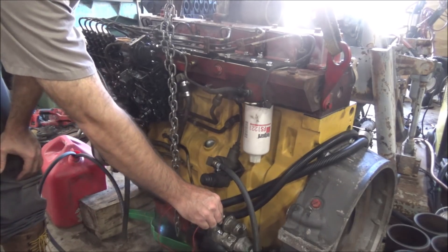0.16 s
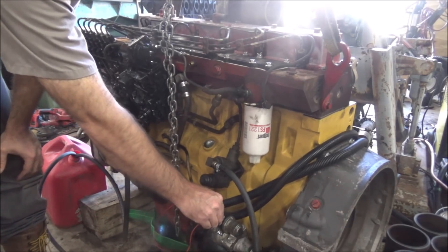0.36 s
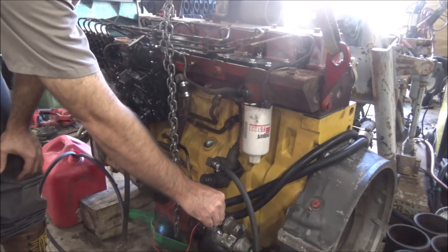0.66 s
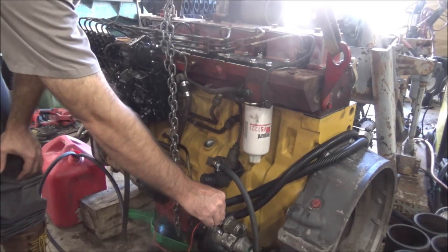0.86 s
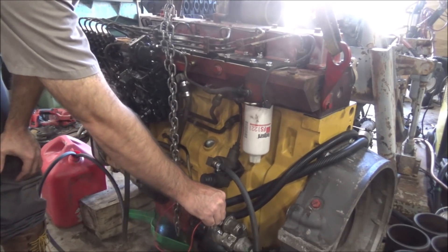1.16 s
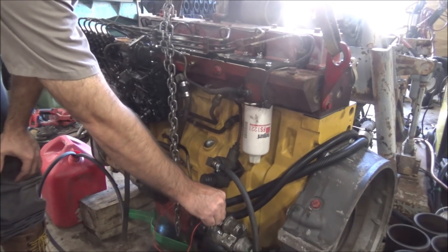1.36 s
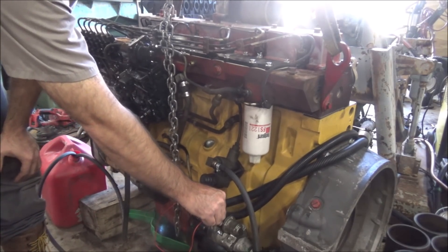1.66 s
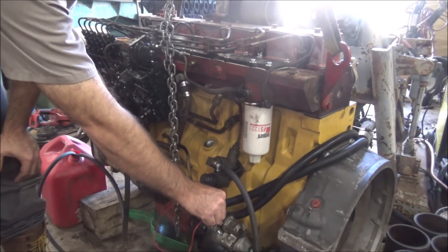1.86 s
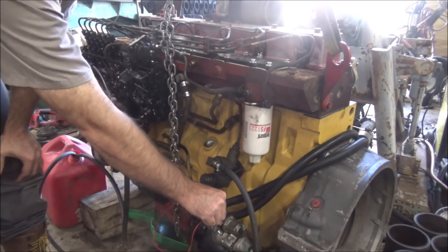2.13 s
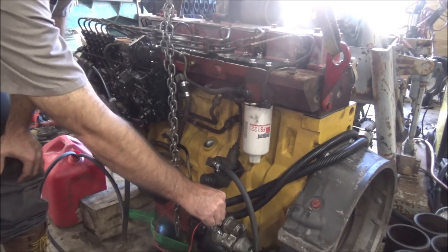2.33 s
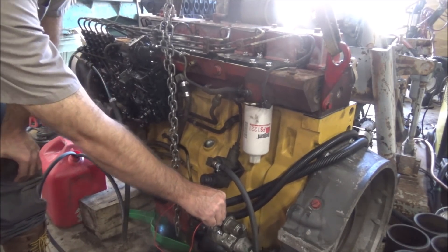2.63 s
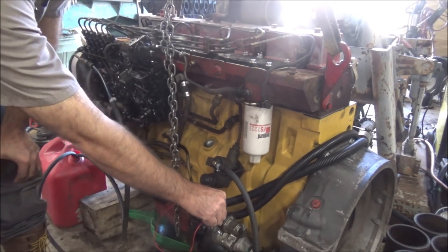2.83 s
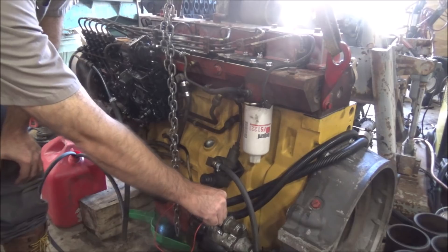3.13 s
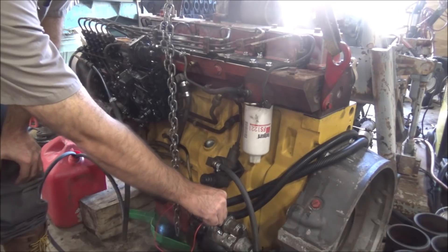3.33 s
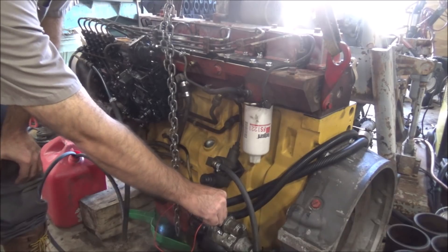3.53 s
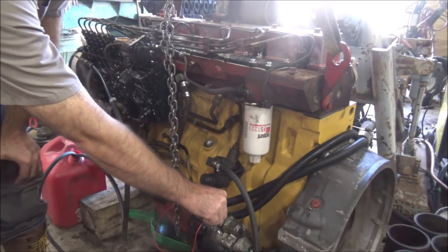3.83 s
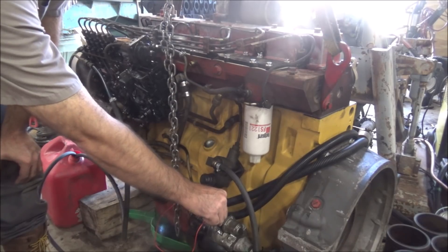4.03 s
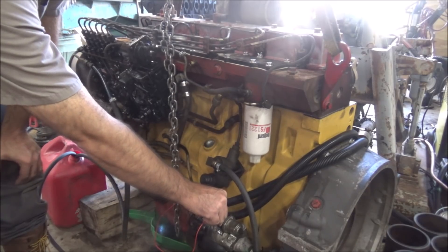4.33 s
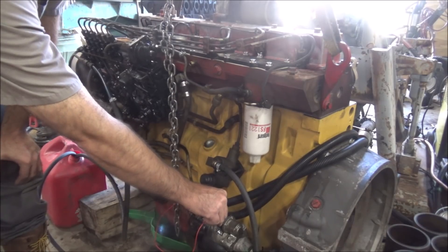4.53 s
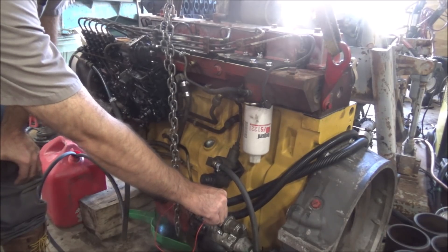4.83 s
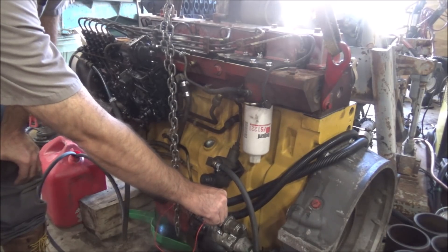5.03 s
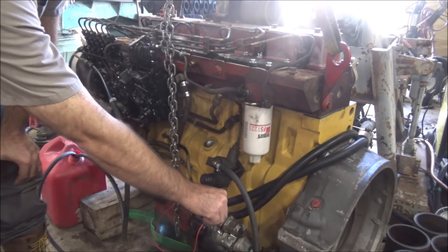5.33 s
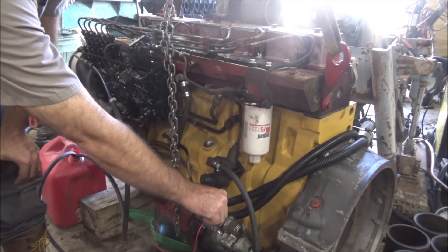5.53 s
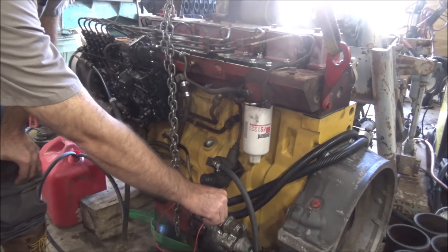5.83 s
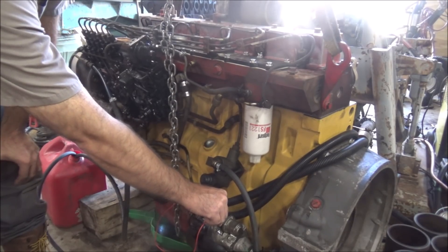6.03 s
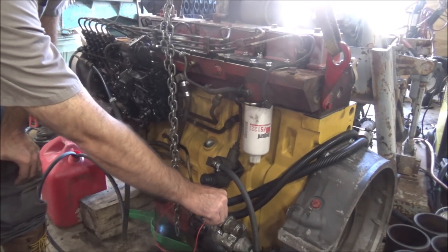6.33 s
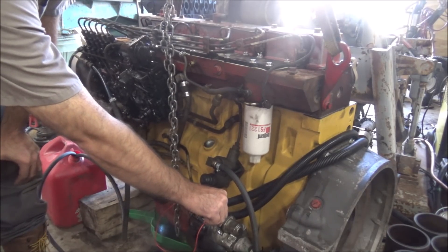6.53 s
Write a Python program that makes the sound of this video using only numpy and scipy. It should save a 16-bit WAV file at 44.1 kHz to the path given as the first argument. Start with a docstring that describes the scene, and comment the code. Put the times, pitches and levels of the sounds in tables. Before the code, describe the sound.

A large diesel engine turns over close by in a workshop with even, clashing metal pulses and a steely ring, never starting.

```python
"""A snap, a screech, then rhythmic grinding and clatter: a big diesel cranks and never fires.
Close by in a workshop, the starter's solenoid throws the pinion into the ring gear, and the pinion
grinds the six-cylinder engine up to speed. On each stroke the flywheel overruns: the teeth clash,
rebound and clatter over a soft low thud. The steel flywheel keeps singing."""
import sys
import numpy as np
from scipy import signal
from scipy.fft import rfft, irfft, next_fast_len
from scipy.io import wavfile
from scipy.ndimage import uniform_filter1d, minimum_filter1d, map_coordinates

SR = 44100
rng = np.random.default_rng(int(sys.argv[2]) if len(sys.argv) > 2 else 0)


def master_out(mix):
    """Clip the mix to full scale and print it as 16-bit PCM to the path in sys.argv[1]."""
    frames = np.transpose(np.atleast_2d(mix))
    ceiling = np.clip(frames, -1, 1)
    pcm = np.round(ceiling * 32767).astype(np.int16)
    wavfile.write(sys.argv[1], SR, pcm)


N = 294588
TIME_S = np.arange(N) / SR

# broad spectra of room noise, block thud and tooth contacts: freq_hz, density_db
SHOP_SPECTRUM = [(20, -26.5), (110, -5), (1000, -12.5), (15000, -32)]
THUD_SPECTRUM = [(25, -13), (60, 0), (120, 5), (600, -59)]
CLATTER_SPECTRUM = [(60, -42.5), (180, -18), (300, -2.5), (600, -0.5), (900, 1.5), (1280, -6), (1700, -1.5),
                    (2300, -4.5), (3200, -13.5), (5000, -15), (11500, -22.5), (15500, -39)]
SCRAPE_SPECTRUM = [(1000, -10.5), (3000, 3), (4300, 3), (5200, -1), (12000, 2), (15500, -7)]
CLASH_SPECTRUM = [(150, -19.5), (400, -6.5), (850, 5), (1280, -5.5), (1850, 7.5), (2400, -2), (3600, 2.5),
                  (5000, -5), (11500, -3), (15500, -12)]
# resonances of block and bell housing, and of the pinion and its nose: freq_hz, width_hz, lift_db
HOUSING_MODES = [(337, 15, 9.5), (403, 33, 7.5), (551, 27, 8), (645, 71, 3), (744.8, 29.6, 12),
                 (831.6, 52, 11), (1054, 68, 9.5), (1161, 39, 8), (1434, 72, 6.5), (1550, 140, 8.5),
                 (1895, 85, 7), (2068, 20.4, 10), (2402, 23, 6), (2680, 13, 9.5), (2880, 436, 10.5),
                 (4070, 330, 6.5)]
PINION_MODES = [(6080, 320, 7), (8300, 1500, 2.5), (10880, 640, 0.5)]
# solenoid, pinion and first tooth contacts: start_s, level_db
ENGAGE_SNAPS = [(.0645, -23), (0.073, -18.5), (.079, -24), (0.124, -12), (.129, -28)]
# ring gear rubbed by the spinning pinion: pitch_hz, level_db
SCREECH_TONES = [(1577, -18), (3895, -32), (5265, -38), (6810, -45), (7881, -41)]
# tooth meshing as the first compressions drag the starter: time_s, tooth_rate_hz, groan_db
MESH_CURVE = [(.1, 255.4, -73), (.15, 275.8, -34.5), (.24, 262.4, -34), (.31, 345.7, -49),
              (.34, 337, -24.5), (.39, 261.7, -29), (.44, 264.7, -31), (.5, 280.3, -41), (.7, 413, -68)]
# harmonics of the meshing teeth: tooth_rate_multiple, level_db
GROAN_HARMONICS = [(1, -7.5), (2, 1.5), (3, -11), (4, -9), (8, -5)]
# teeth sliding under the heaviest load: pitch_hz, half_width_hz, level_db
SQUEAL_MODES = [(2770, 27, -34), (3920, 77, -35.5), (8600, 580, -37.5), (11400, 660, -38)]
# squeals: start_s
SQUEAL_STARTS_S = [0.263, 0.405, 0.52]
# slow first compressions, before the flywheel overruns: start_s, grind_db, thud_db
FIRST_HEAVES = [(.18, -21, 8), (.37, -38, 7), (.53, -24.5, 9)]
# cylinders in compression order: late_s, clatter_db, clatter_hold_s
CYLINDER_TRAITS = [(-.0062, -22, 0.049), (.0009, -23, 0.047), (.002, -24, 0.041), (-.0006, -21.5, 0.049),
                   (-.0003, -23, .047), (0, -25, 0.041)]
# lasting flywheel modes: pitch_hz, half_width_hz, relative_db, common_swell_share
FLYWHEEL_MODES = [(731.3, 9.7, -6, 0.13), (1556, 8.8, -2, 0.86), (2602, 9.1, -11, 0.23),
                  (2660, 5.2, -28, 0.25), (3920, 6.7, -12, 0.12), (3964, 30, -15, 0.31)]
# common level of the flywheel's ringing: time_s, level_db
RING_CURVE = [(.13, -19), (.2, -48), (.35, -31), (.43, -30), (.72, -24), (1.6, -24.5), (2, -27),
              (4.3, -28.5), (6.68, -34)]
# part of the engine sound added on the right, subtracted on the left: freq_hz, gain_db
RIGHT_LEAN = [(200, -94), (600, -37.5), (2500, -20.5), (6000, -34)]

FRESH_RPM, TIRED_RPM, TIRING_STROKES = 190.69, 176.654, 17.675
FIRST_STROKE_S, STROKES_PER_TURN, STROKE_COUNT = 0.7185, 3, 54
LOAD_START_S, LOAD_ATTACK_S, LOAD_HOLD_S, LOAD_EASE_S = 0.074, 0.0088, 0.57, 0.35
RING_USUAL_DB, RING_TURN_DB, RING_CHANCE_DB, RING_PEAK_S = -30.4, 2.1, 2.5, 0.69
GRIND_DB, GRIND_LOAD_LIFT_DB = -30, 7
SCRAPE_DB, SCRAPE_LOAD_LIFT_DB = -39.5, 8
CLASH_DB, CLASH_SCATTER_DB, CLATTER_SCATTER_DB = -20.3, 4, 1.84
BOUNCE_FLIGHT_S, BOUNCE_DB, BOUNCE_LOSS_DB = 0.0152, -27, 5.5
TOP_HZ = 15800


def amp(db):
    """Decibels to gain."""
    return 10 ** (np.asarray(db) / 20)


def unit(x):
    """x at rms 1."""
    return x / np.sqrt(np.mean(x ** 2) + 1e-20)


def along(points, hz):
    """Interpolate (freq_hz, value) points on a log axis."""
    freq_hz, values = np.transpose(points)
    return np.interp(np.log(hz + 1), np.log(freq_hz + 1), values)


def curves(rows):
    """One value per sample for each column after time_s."""
    time_s, *columns = np.transpose(rows)
    return [np.interp(TIME_S, time_s, column) for column in columns]


def wobble(rate_hz):
    """Smooth random curve with knots at rate_hz."""
    return map_coordinates(rng.standard_normal(int(N * rate_hz / SR) + 4), [TIME_S * rate_hz])


def filtered(x, response):
    """Zero-phase filter with gain response(hz)."""
    size = next_fast_len(N + SR // 2)
    return irfft(rfft(x, size) * response(np.fft.rfftfreq(size, 1 / SR)), size)[..., :N]


def coloured(x, spectrum, modes=(), size=16384):
    """Minimum-phase filter of energy 1: a broad spectrum plus ringing resonances."""
    hz = np.fft.rfftfreq(size, 1 / SR)
    lift_db = sum(db / (1 + (2 * (hz - mode_hz) / width_hz) ** 2) for mode_hz, width_hz, db in modes)
    cepstrum = irfft(np.log(amp(along(spectrum, hz) + lift_db)))
    response = irfft(np.exp(rfft(2 * cepstrum[:size // 2], size)))
    return signal.fftconvolve(x, response / np.linalg.norm(response))[:N]


def bursts(starts_s, levels_db, rise_s, hold_s, t60_s):
    """Envelope that rises, holds and dies after each start; overlaps add in power."""
    t = np.arange(SR // 4) / SR
    shape = (1 - np.exp(-t / rise_s)) * amp(-60 * np.maximum(t - hold_s, 0) / t60_s)
    starts = np.round(np.asarray(starts_s) * SR).astype(int)
    power = np.bincount(starts, np.ones(len(starts)) * amp(levels_db) ** 2, N)
    return np.sqrt(np.abs(signal.fftconvolve(power, shape ** 2)[:N]))


def singing(pitch_hz, half_width_hz):
    """A continuously fed mode, wavering in phase and strength around rms 1."""
    noise = rng.standard_normal(N)
    mode = unit(filtered(noise, lambda hz: 1 / (1 + ((hz - pitch_hz) / half_width_hz) ** 2)))
    return mode / np.sqrt(np.abs(uniform_filter1d(mode ** 2, size=3000)) + .03)


def tail(x, t60_s):
    """x through dense modes of equal decay, at unit energy gain."""
    t = np.arange(SR // 2) / SR
    modes = rng.standard_normal(len(t)) * amp(-60 * t / t60_s)
    return signal.fftconvolve(x, modes / np.linalg.norm(modes))[:N]


def stroke_times():
    """Compressions slow as the battery tires; each cylinder has its own timing offset."""
    stroke = np.arange(STROKE_COUNT)
    rpm = TIRED_RPM + (FRESH_RPM - TIRED_RPM) * np.exp(-stroke / TIRING_STROKES)
    gaps_s = 60 / (rpm * STROKES_PER_TURN)
    late_s = np.resize(np.transpose(CYLINDER_TRAITS)[0], STROKE_COUNT)
    return FIRST_STROKE_S + np.cumsum(gaps_s) - gaps_s + late_s


def bite():
    """Ramp from 0 to 1 as the pinion takes up load."""
    return np.clip((TIME_S - LOAD_START_S) / LOAD_ATTACK_S, 0, 1)


def load():
    """Share of full starter load: bites, holds, eases as the flywheel takes over."""
    return bite() * np.exp(-np.maximum(TIME_S - LOAD_START_S - LOAD_HOLD_S, 0) / LOAD_EASE_S)


def contact(dip):
    """Tooth grip dips just before each clash as the flywheel runs ahead of the pinion."""
    return 1 - dip * bursts(stroke_times() - .016, 0, rise_s=.0074, hold_s=.0347, t60_s=.01)


def teeth(scatter_teeth, uneven_db, t60_s, rub):
    """One short scuff per meshing tooth, early or late, over steady rubbing."""
    passed = np.cumsum(curves(MESH_CURVE)[0]) / SR
    tooth = np.arange(1, int(passed[-1]))
    late, harder = rng.standard_normal((4096, 2))[:len(tooth)].T
    starts_s = np.interp(tooth + scatter_teeth * late, passed, TIME_S)
    scuffs = unit(bursts(starts_s, uneven_db * harder, rise_s=.00005, hold_s=0, t60_s=t60_s))
    return unit((scuffs + rub) * rng.standard_normal(N))


def shop_noise():
    """Low, steady noise of the workshop."""
    return amp(-48.5) * coloured(rng.standard_normal(N), SHOP_SPECTRUM)


def wall_echo(x):
    """Cluttered walls return a short diffuse tail, one per side."""
    walls = np.array([tail(x, t60_s=.11) for side in range(2)])
    return amp(-26) * filtered(walls, lambda hz: 1 / (1 + (hz / 10000) ** 8))


def compression():
    """Trapped air in each cylinder shoves the block: a soft thud and a short boom of the stand."""
    heave_s, _, heave_db = np.transpose(FIRST_HEAVES)
    push = bursts(stroke_times() + .012, 0, rise_s=.0037, hold_s=.057, t60_s=.26)
    lurch = bursts(heave_s, heave_db, rise_s=.051, hold_s=.24, t60_s=.1)
    thud = amp(-58) * (push + lurch) * coloured(rng.standard_normal(N), THUD_SPECTRUM)
    boom = amp(-52) * push * singing(pitch_hz=111.5, half_width_hz=5)
    return thud + boom


def engagement():
    """The solenoid buzzes and snaps; the pinion screeches on the ring gear until it drops in."""
    hum = unit(np.sin(2 * np.pi * 118 * TIME_S))
    buzz = hum * bursts([0], -39, rise_s=.00099, hold_s=.039, t60_s=.017)
    snap_s, snap_db = np.transpose(ENGAGE_SNAPS)
    impacts = bursts(snap_s, snap_db, rise_s=.0001, hold_s=.0015, t60_s=.043)
    snaps = coloured(impacts * rng.standard_normal(N), SCRAPE_SPECTRUM, PINION_MODES)
    warped_s = np.cumsum(1 + .0062 * wobble(213)) / SR
    tones = sum(amp(db) * np.sqrt(2) * np.sin(2 * np.pi * hz * warped_s) for hz, db in SCREECH_TONES)
    screech = tones * bursts([.084], 1.5, rise_s=.0046, hold_s=.042, t60_s=.045)
    return buzz + snaps + screech


def mesh_whine():
    """Loaded teeth groan, mostly at twice their rate, squeal and rasp; the housing hums along."""
    tooth_hz, groan_db = curves(MESH_CURVE)
    phase = 2 * np.pi * np.cumsum(tooth_hz * (1 + .008 * wobble(150))) / SR
    harmonics = unit(sum(amp(db) * np.sin(round(k) * phase) for k, db in GROAN_HARMONICS))
    groan = amp(groan_db + wobble(56)) * harmonics
    sliding = bursts(SQUEAL_STARTS_S, 0, rise_s=.0096, hold_s=.084, t60_s=.079)
    squeal = sliding * sum(amp(db) * singing(hz, half_hz) for hz, half_hz, db in SQUEAL_MODES)
    rasp = amp(-35) * load() * singing(pitch_hz=2850, half_width_hz=390)
    strain = bursts([.16], -30, rise_s=.014, hold_s=.46, t60_s=.3)
    housing_hum = strain * singing(pitch_hz=834, half_width_hz=13)
    return groan + squeal + rasp + housing_hum


def flywheel():
    """The steel disc rings on, swells once a turn, slowly fades, and sags when the teeth part."""
    stroke_turns = np.arange(STROKE_COUNT) / STROKES_PER_TURN
    turns = np.interp(TIME_S - RING_PEAK_S + FIRST_STROKE_S, stroke_times(), stroke_turns)
    swing_db = RING_TURN_DB * np.cos(2 * np.pi * turns) + RING_CHANCE_DB * np.tanh(wobble(7))
    common_db = curves(RING_CURVE)[0] + np.minimum(TIME_S / FIRST_STROKE_S, 1) ** 2 * swing_db
    ring = np.zeros(N)
    for pitch_hz, half_width_hz, relative_db, share in FLYWHEEL_MODES:
        # part common swell, part the mode's own flare
        swell_db = share * (common_db - RING_USUAL_DB) + (1 - share) * 3 * wobble(9)
        ring += amp(RING_USUAL_DB + relative_db + swell_db) * singing(pitch_hz, half_width_hz)
    engaged_s = ENGAGE_SNAPS[-1][0]
    turning = np.clip((TIME_S - engaged_s) / .02, 0, 1)
    return turning * contact(dip=.39) * ring


def jangle(x):
    """Thin steel parts add dense, short rings to the treble of x."""
    treble = filtered(x, lambda hz: hz ** 4 / (hz ** 4 + 3500 ** 4))
    return x + .36 * tail(treble, t60_s=.045)


def clatter(clatter_db):
    """The pinion rattles in its backlash on each stroke."""
    starts_s = stroke_times() + .0019
    power = np.zeros(N)
    for cylinder, (_, _, hold_s) in enumerate(CYLINDER_TRAITS):
        own = slice(cylinder, None, len(CYLINDER_TRAITS))
        power += bursts(starts_s[own], clatter_db[own], rise_s=.0021, hold_s=hold_s, t60_s=.11) ** 2
    scuffs = teeth(scatter_teeth=.3, uneven_db=2, t60_s=.0081, rub=.45)
    return coloured(np.sqrt(power) * scuffs, CLATTER_SPECTRUM, HOUSING_MODES)


def grind(grip):
    """Driving teeth grind through the housing, hardest in the first heaves."""
    heave_s, heave_db, _ = np.transpose(FIRST_HEAVES)
    heaves = bursts(heave_s, heave_db, rise_s=.011, hold_s=.075, t60_s=.14)
    force = np.hypot(amp(GRIND_DB + GRIND_LOAD_LIFT_DB * load()), heaves)
    scuffs = teeth(scatter_teeth=.2, uneven_db=2, t60_s=.015, rub=.42)
    return coloured(grip * force * scuffs, CLATTER_SPECTRUM, HOUSING_MODES)


def scrape(grip, clatter_db):
    """Sliding teeth excite the bright pinion modes, under load and with each clatter."""
    driven = grip * amp(SCRAPE_DB + SCRAPE_LOAD_LIFT_DB * load())
    slips = bursts(stroke_times() + .025, clatter_db - 23.5, rise_s=.0043, hold_s=.063, t60_s=.094)
    scuffs = teeth(scatter_teeth=.35, uneven_db=6, t60_s=.018, rub=1)
    return coloured((driven + slips) * scuffs, SCRAPE_SPECTRUM, PINION_MODES)


def gears():
    """The pinion drives the ring gear; clatter varies by cylinder and by chance."""
    cylinder_db = np.resize(np.transpose(CYLINDER_TRAITS)[1], STROKE_COUNT)
    clatter_db = cylinder_db + CLATTER_SCATTER_DB * rng.standard_normal(STROKE_COUNT)
    grip = bite() * contact(dip=.22)
    return clatter(clatter_db) + grind(grip) + scrape(grip, clatter_db)


def clashes():
    """The flywheel overruns the pinion: each clash swells in briefly, hits, then bounces twice."""
    stroke_s = stroke_times()
    force, late, harder = rng.standard_normal((STROKE_COUNT, 3)).T
    clash_db = CLASH_DB + CLASH_SCATTER_DB * force
    lead_in = bursts(stroke_s - .004, clash_db - 10, rise_s=.004, hold_s=.004, t60_s=.02)
    hit = bursts(stroke_s, clash_db, rise_s=.00044, hold_s=.0031, t60_s=.065)
    flight_s = BOUNCE_FLIGHT_S + .0015 * late
    first_db = BOUNCE_DB + 2 * harder
    bounce_s = np.r_[stroke_s + flight_s, stroke_s + 2 * flight_s]
    bounce_db = np.r_[first_db, first_db - BOUNCE_LOSS_DB]
    bounces = bursts(bounce_s, bounce_db, rise_s=.001, hold_s=.005, t60_s=.05)
    blows = np.sqrt(lead_in ** 2 + hit ** 2 + bounces ** 2)
    scuffs = teeth(scatter_teeth=.32, uneven_db=-1.5, t60_s=.011, rub=.98)
    return coloured(blows * scuffs, CLASH_SPECTRUM, HOUSING_MODES + PINION_MODES)


def scene():
    """The engine just right of centre, between walls, over the shop noise."""
    engine = jangle(gears() + clashes()) + flywheel() + mesh_whine() + engagement() + compression()
    lean = filtered(engine, lambda hz: amp(along(RIGHT_LEAN, hz)))
    return shop_noise() + wall_echo(engine) + engine + np.array([-lean, lean])


def record(dry):
    """Peak limiter, then a sharp low-pass at TOP_HZ."""
    ceiling = .28
    needed_gain = np.minimum(1, ceiling / (np.abs(dry).max(axis=0) + 1e-9))
    gain = uniform_filter1d(minimum_filter1d(needed_gain, size=120), size=120)
    return filtered(dry * gain, lambda hz: hz < TOP_HZ)


dry = scene()
out = record(dry)
master_out(out)
```